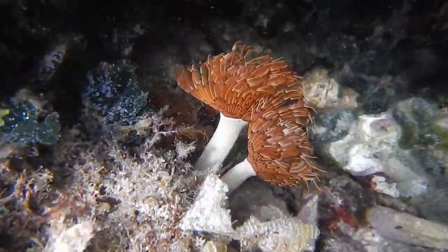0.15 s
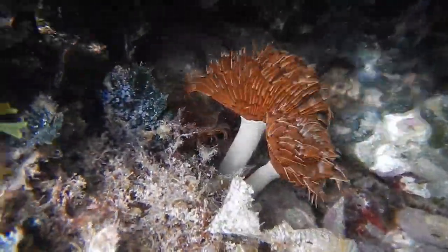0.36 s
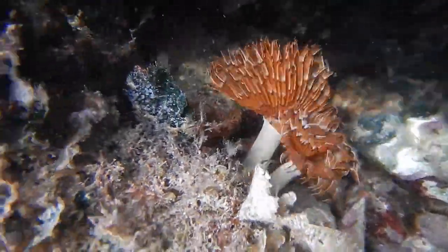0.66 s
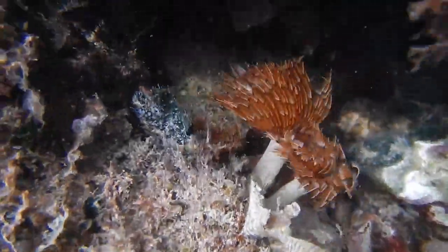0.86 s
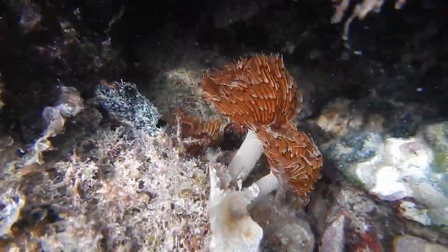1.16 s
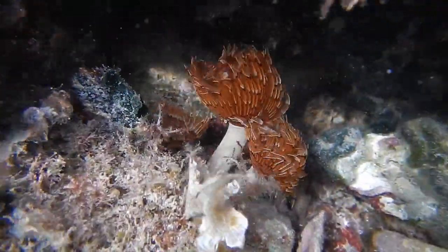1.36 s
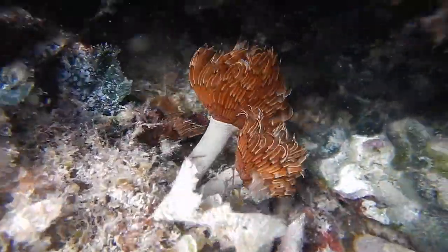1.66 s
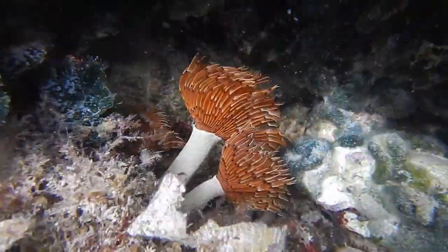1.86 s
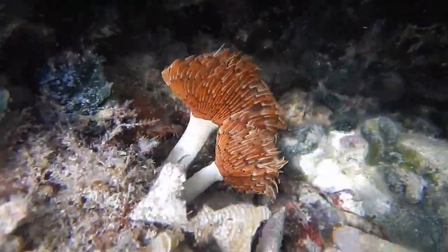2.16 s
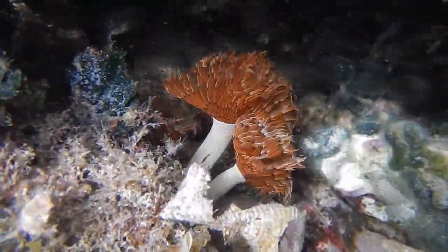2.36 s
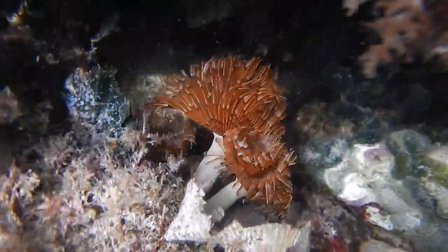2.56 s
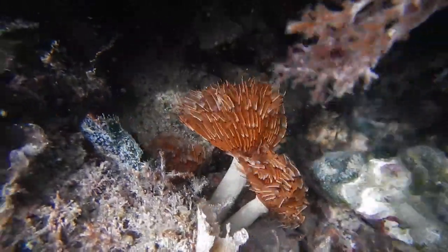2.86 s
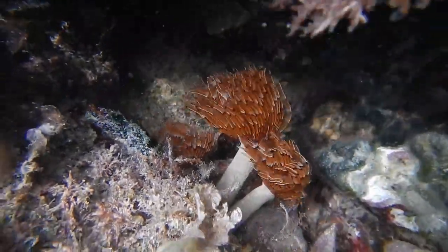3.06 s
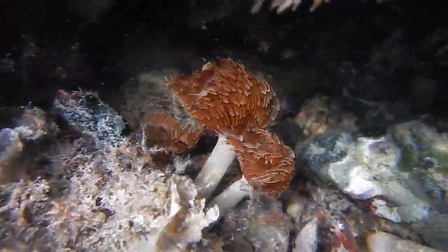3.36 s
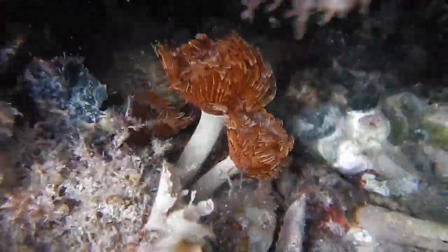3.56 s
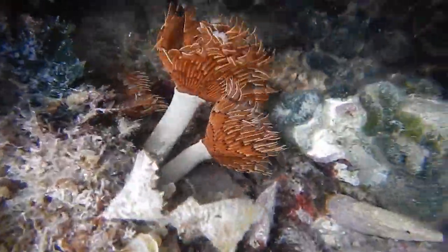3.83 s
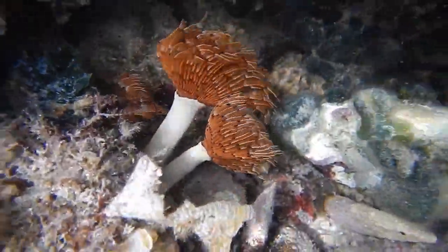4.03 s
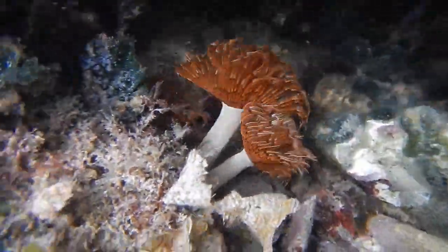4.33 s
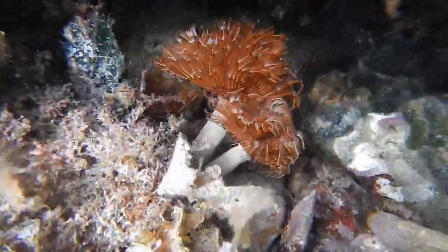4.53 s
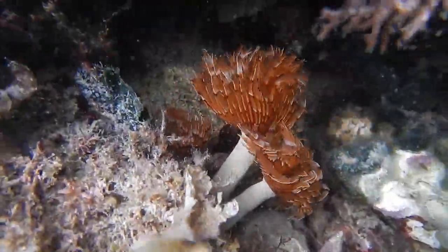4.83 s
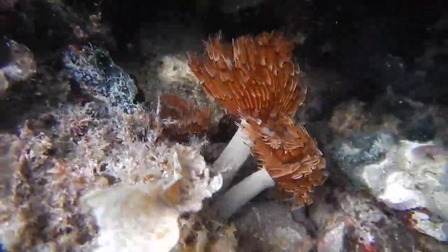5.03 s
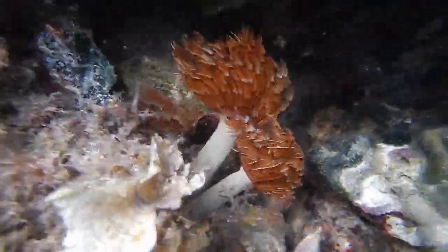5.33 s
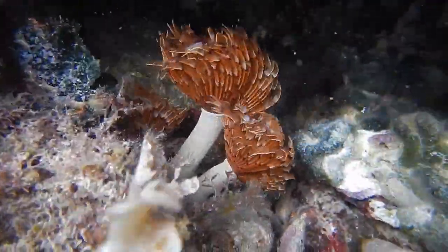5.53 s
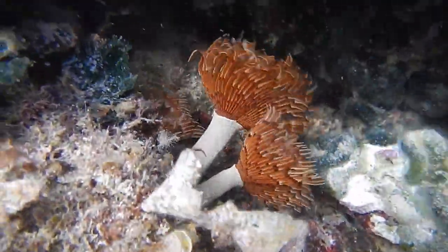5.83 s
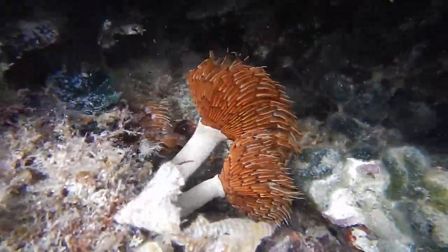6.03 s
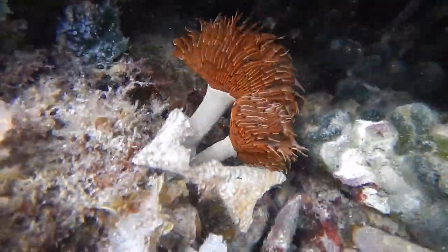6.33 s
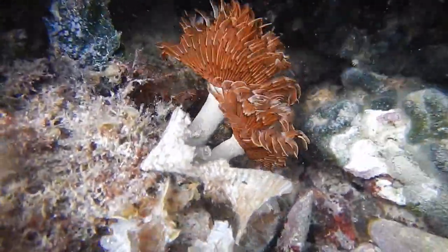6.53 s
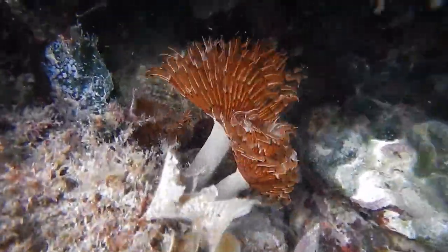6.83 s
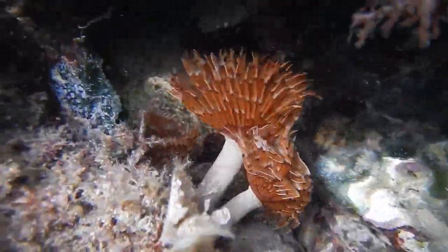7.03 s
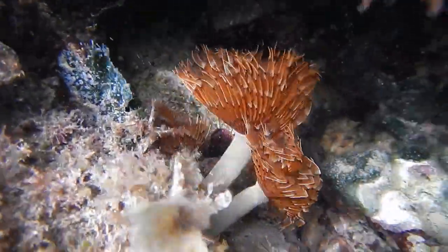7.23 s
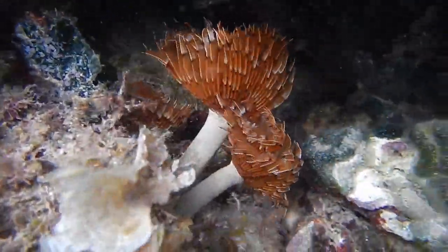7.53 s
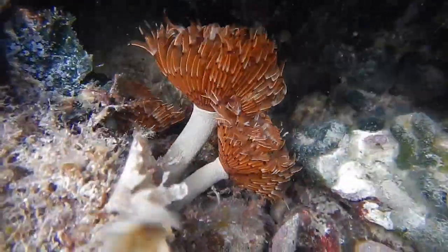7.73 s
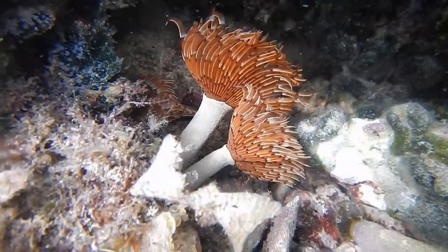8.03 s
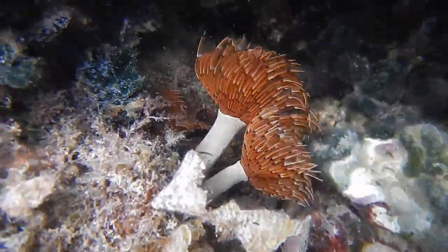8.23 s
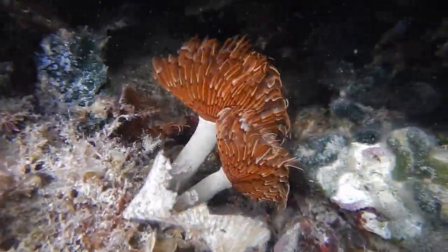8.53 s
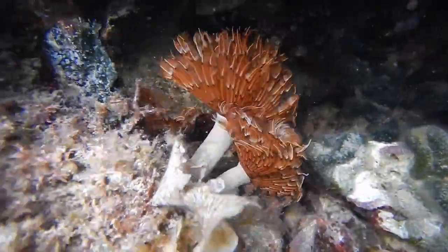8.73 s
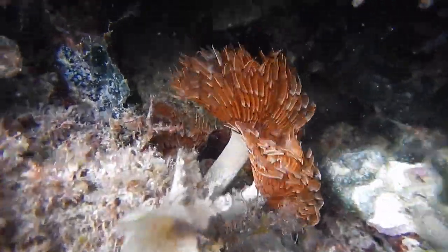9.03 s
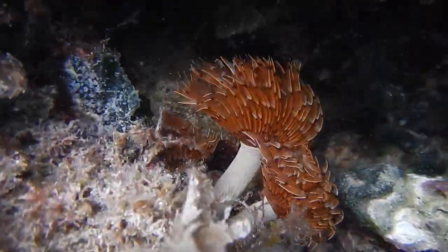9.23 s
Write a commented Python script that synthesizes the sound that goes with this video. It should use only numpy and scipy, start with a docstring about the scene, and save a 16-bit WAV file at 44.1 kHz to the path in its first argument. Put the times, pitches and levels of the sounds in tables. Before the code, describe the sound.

Hollow, boxed-in water noise swells and dips in a rocky shallow while brittle clicks crack over low bumps and stony knocks.

```python
"""A soft push and dull knocks over a held-down rush of water, then sharp snaps: a housed camera in swell.
Buffeting, slosh and rush are filtered noise with drifting levels; surges lift them and ticks prickle on top.
Thuds, stone knocks, grit and snaps (shrimp, grit) are single pulses that ring the watertight housing,
each with scatter off nearby rock. A gain control ducks on peaks over its ceiling, so the rush drops
and swells back at a steady rate; notches and a band limit finish the sound."""
import sys
import numpy as np
from scipy import signal
from scipy.fft import rfft, irfft, next_fast_len
from scipy.io import wavfile
from scipy.ndimage import uniform_filter1d, minimum_filter1d, map_coordinates

SR = 44100
rng = np.random.default_rng(int(sys.argv[2]) if len(sys.argv) > 2 else 0)


def master(y):
    """Save y as 16-bit WAV."""
    cut = np.clip(np.atleast_2d(y).T, -1, 1)
    pcm = np.round(cut * 32767)  # scale
    wavfile.write(sys.argv[1], SR, pcm.astype(np.int16))


N = 413658

# Event levels are peaks ahead of the gain control; spectra are relative.
# swell, surges and lulls: crest t/s, 1/e half width/s, lift/dB
SWELL_LIFTS = [(0.122, 0.12, 9.5), (0.65, 0.43, 3.5), (1.9, 0.57, 0.5), (3.299, 0.25, -4.5),
               (4.399, 0.16, 11), (5.3, 0.33, 11), (5.851, 0.16, 11), (8.4, 0.079, -3), (9.15, 0.39, 5.5)]
# low buffeting of the housing by eddies: f/Hz, density/(dB per Hz)
BUFFET_SPECTRUM = [(12, -11.5), (30, -2), (80, 0), (150, -3), (230, -5), (400, -34.5), (900, -83)]
# slosh in the low resonances: f/Hz, density/(dB per Hz)
SLOSH_SPECTRUM = [(100, -40), (200, -14.5), (270, -9.5), (322, -1), (360, -5), (400, -2.5), (460, -8.5),
                  (540, -23), (900, -47.5), (2000, -80)]
# rush in the middle resonances: f/Hz, density/(dB per Hz)
RUSH_SPECTRUM = [(250, -20.5), (600, -0.5), (800, -1.5), (1000, 6), (1170, -3), (1400, 0.5), (1750, -13),
                 (2150, -14.5), (2550, -39.5), (2900, -27), (3400, -30), (3850, -41.5), (5200, -44.5),
                 (6400, -44), (7400, -53.5), (8400, -50.5), (9400, -59), (16000, -72.5)]
# far ticks ahead of their low-pass: f/Hz, density/(dB per Hz)
TICK_SPECTRUM = [(400, -15.5), (1000, -1.5), (1400, 9.5), (2000, -5), (2950, 0.5), (3500, -10), (5000, -20)]
# soft pushes on the housing: t/s, level/dB, tilt/(dB per octave)
THUD_EVENTS = [(0.053, 16.5, -8), (0.069, 11, 8.5), (0.083, 8, -0.5), (0.236, 6, 1), (0.311, -2, -4.5),
               (0.871, -4, 13), (0.976, -1.7, -3), (1.821, -4, 4), (2.085, -7.5, -2), (2.174, -4, 0.5),
               (3.074, -9, 1), (3.905, -6, 17.5), (4.37, 2, 7), (4.456, 2.5, 6.5), (4.643, -7, 19.5),
               (5.489, -4.5, -6), (6.486, -2.2, 4.5), (7.115, -7, 26.5), (7.492, -1.3, 13.5),
               (7.995, -3.5, 12), (9.291, -7, 8)]
# housing colour under a soft push: f/Hz, level/dB
THUD_COLOUR = [(30, -38), (120, -23), (240, -14), (325, 4), (395, 3), (500, -12.5), (700, -21), (1100, -28),
               (1600, -34), (3000, -76), (8000, -100)]
# dull knocks of shifting stones: t/s, level/dB, roll-off f/Hz
STONE_KNOCKS = [(0.1179, 11.5, 1320), (0.1544, 0.5, 1660), (0.3749, 8.5, 1150), (1.4959, 4, 1426),
                (2.7785, 11.5, 1110), (3.3134, 4, 1510), (3.3314, 12, 2400), (3.5745, -2, 2300),
                (3.742, 6.5, 1600), (3.7519, 15.5, 1970), (3.7905, 4, 1500), (4.9996, 13, 2405),
                (5.0623, 8, 720), (5.188, -6, 3220), (6.395, -9.5, 4200), (7.1639, 6.5, 1900),
                (7.7578, 11.5, 1200), (7.949, 2.5, 900), (8.0438, -4, 1900), (8.5237, -2, 890),
                (8.724, 2, 1250), (9.1976, -2, 2370)]
# grit rolled over the rock: middle t/s, half length/s, level/dB
GRIT_FLURRIES = [(2.598, 0.05, -8.5), (3.639, 0.079, -5.5), (4.428, 0.055, -3.5), (4.928, 0.05, -8),
                 (5.62, 0.06, -3)]
# sharp snaps: t/s, level/dB, tilt/(dB per octave), scatter off rock/dB
SNAP_EVENTS = [(0.2773, 16.5, -2.5, -6.5), (0.998, 13, -0.5, -2.5), (1.5568, 23, 0, -6.5),
               (1.701, -10, 13, -8), (1.7208, 24, -5.5, -6), (2.224, 4, -3.5, -2.5),
               (2.6688, 14.5, -3.5, -7), (2.8647, 19.5, -1, -8.5), (3.7174, 12, -1, 7),
               (4.586, -3.5, -3, 2.5), (4.9299, -0.5, -3.5, -4.5), (4.9834, 1, -0.5, 4.5),
               (4.9867, 11.5, 0.5, 4), (5.6518, 5, -4, 8.5), (5.6827, 12, 2.5, 4.5), (5.7467, 13.5, -3, -6),
               (5.7564, 28, 1.5, 0.5), (7.1586, 17, 0, 0), (7.7298, 23.5, -1.5, -4.5),
               (8.6015, 11.5, -2, -0.5), (8.6907, 20, -4, -7)]
# housing colour under a snap or knock: f/Hz, level/dB
STRIKE_COLOUR = [(100, -28), (350, -22), (600, -13), (760, -3), (870, -10), (1020, 4.5), (1200, -1),
                 (1450, 2), (1700, -9.5), (2150, -14.5), (3200, -23.5), (4500, -29), (6500, -35.5),
                 (16000, -51)]
# likeness of the two microphones: f/Hz, correlation (-1..1)
MIC_LIKENESS = [(50, 0.37), (130, 0.9), (380, 1), (560, 0.057), (1400, 0.94), (3500, 0.89)]
# left over right, ahead of each source's lean factor: f/Hz, level/dB
MIC_BALANCE = [(50, -1.5), (350, -2), (650, -1), (850, 3.5), (1020, 3.5), (1400, 11.5), (1800, 5),
               (3000, 9), (4200, 1), (8000, 3.5)]
# phase by which left leads right: f/Hz, phase/rad
MIC_LEAD = [(420, -0.28), (750, -0.96), (1300, -0.8), (2200, -1.68), (4500, -1.41), (9000, -0.86)]
# narrow rejected bands: f/Hz, width/Hz
NOTCH_BANDS = [(2500, 270), (5000, 110), (6000, 90), (7000, 90), (8000, 90), (9000, 90), (10000, 90),
               (11000, 90)]

# steady current, rms ahead of swell, drift and gain control
BUFFET_DB, SLOSH_DB, RUSH_DB = -35, -24.5, -22
# share of the swell lift (slosh takes all of it)
BUFFET_FOLLOWS_DB_PER_DB, RUSH_FOLLOWS_DB_PER_DB = 0.41, 0.17
TICKS_PER_S, TICK_DECAY_S, TICK_TOP_HZ, TICKS_RE_RUSH_DB = 40, 0.0035, 3900, -23.5
KNOCK_TILT_DB_PER_OCT, KNOCK_SCATTER_DB = 6.5, -3
GRIT_COUNT, GRIT_DB, GRIT_MID_ROLLOFF_HZ = 24, -13, 2200
FLURRY_GRAINS, FLURRY_MID_ROLLOFF_HZ, GRAIN_SPREAD_OCT = 8, 1620, 0.49
# a harder snap is a shorter pulse: roll-off at 0 dB, level step that doubles it
SNAP_ROLLOFF_AT_0DB_HZ, SNAP_DOUBLING_DB = 6000, 19
HIT_SAMPLES, ONSET_SAMPLES = 4096, 20
STRIKE_ADVANCE_S = 0.0005  # offsets the onset samples
TOP_HZ = 16500


def amp(db):
    """Decibels to gain."""
    return 10 ** (np.asarray(db) / 20)


def unit(x):
    """Scale to rms 1."""
    return x / np.sqrt(np.mean(x ** 2) + 1e-20)


def along(points, hz):
    """Read (f/Hz, value) points on a log frequency axis."""
    f, value = np.transpose(points)
    return np.interp(np.log(hz + 1), np.log(f + 1), value)


def wobble(knots_per_s):
    """Smooth random curve through normal knots."""
    knots = rng.standard_normal(int(N * knots_per_s / SR) + 4)
    return map_coordinates(knots, [np.arange(N) * knots_per_s / SR])


def filtered(x, response):
    """Apply a complex frequency response to x."""
    m = next_fast_len(N + SR // 2)
    return irfft(rfft(x, m) * response(np.fft.rfftfreq(m, 1 / SR)), m)[..., :N]


def causal(db):
    """Minimum-phase response with this gain: rings after a blow, never before."""
    cepstrum = irfft(np.log(amp(db)))
    half = len(cepstrum) // 2
    fold = np.r_[1, np.full(half - 1, 2), 1, np.zeros(half - 1)]
    return np.exp(rfft(cepstrum * fold))


def microphones(hz, lean):
    """Housing wall flexes differently at each microphone: level and phase differ by band."""
    side = np.array([[.5], [-.5]])
    gain = amp(side * lean * along(MIC_BALANCE, hz))
    return gain * np.exp(1j * side * along(MIC_LEAD, hz))


def add(track, s, sound):
    """Mix a short stereo sound in at time s."""
    start = int(np.clip(round(s * SR), 0, N - 1))
    track[:, start:start + sound.shape[1]] += sound[:, :N - start]


def surge():
    """Swell lift in dB: a sum of bell-shaped surges and lulls."""
    t = np.arange(N) / SR
    return sum(db * np.exp(-((t - s) / width) ** 2) for s, width, db in SWELL_LIFTS)


def turbulence(spectrum, patchy_db):
    """Stereo flow noise of rms 1 whose gain drifts in patches of time and frequency."""
    z = signal.stft(rng.standard_normal((2, N)), nperseg=512)[2]
    field = uniform_filter1d(rng.standard_normal(z.shape[1:]), size=5, axis=0)
    field = uniform_filter1d(field, size=7, axis=1)
    pair = signal.istft(z * amp(patchy_db * unit(field)), nperseg=512)[1][:, :N]

    def mid_side(hz):
        turn = np.arccos(np.clip(along(MIC_LIKENESS, hz), -1, 1)) / 2
        return amp(along(spectrum, hz)) * [np.cos(turn), np.sin(turn)]

    mid, side = filtered(pair, mid_side)
    left_right = np.array([mid + side, mid - side])
    return unit(filtered(left_right, lambda hz: microphones(hz, lean=0.71)))


def far_ticks():
    """Random decaying puffs of noise, rms 1: most tiny, a few strong, top octaves lost."""
    sizes = amp(5.9 * np.minimum(rng.exponential(size=N), 2.6))
    impulses = (rng.random(N) < TICKS_PER_S / SR) * sizes
    puffs = signal.lfilter([1], [1, -np.exp(-1 / (TICK_DECAY_S * SR))], impulses)
    lowpass = signal.butter(6, TICK_TOP_HZ, fs=SR, output="sos")
    return unit(signal.sosfilt(lowpass, puffs * turbulence(TICK_SPECTRUM, patchy_db=4)))


def water():
    """Eddies buffet the housing and stir its low and middle resonances; far ticks on top."""
    lift_db = surge()
    buffet_db = BUFFET_DB + BUFFET_FOLLOWS_DB_PER_DB * lift_db + 0.53 * wobble(9.9)
    slosh_db = SLOSH_DB + lift_db + 3.2 * wobble(36)
    rush_db = RUSH_DB + RUSH_FOLLOWS_DB_PER_DB * lift_db
    rush_drift_db = 0.7 * wobble(18) + 0.9 * wobble(90)
    buffet = amp(buffet_db) * turbulence(BUFFET_SPECTRUM, patchy_db=1.6)
    slosh = amp(slosh_db) * turbulence(SLOSH_SPECTRUM, patchy_db=0.5)
    rush = amp(rush_db + rush_drift_db) * turbulence(RUSH_SPECTRUM, patchy_db=2.07)
    return buffet + slosh + rush + amp(rush_db + TICKS_RE_RUSH_DB) * far_ticks()


def blow(colour_db, echo_db, t60_s, lean):
    """One pressure pulse plus scatter off nearby rock, ringing the housing; peak 1."""
    t, hz = np.arange(HIT_SAMPLES) / SR, np.fft.rfftfreq(HIT_SAMPLES, 1 / SR)
    # shared part, then a weaker part per channel
    scatter = rng.standard_normal(HIT_SAMPLES) + 0.25 * rng.standard_normal((2, HIT_SAMPLES))
    scatter = scatter * amp(-60 * t / t60_s) * (1 - np.exp(-(t / 0.00074) ** 2))
    scatter = scatter / np.linalg.norm(scatter[0])
    # weed and rough rock return little treble
    echoes = amp(echo_db) * rfft(scatter) / (1 + (hz / 3200) ** 2)
    sound = irfft((1 + echoes) * causal(colour_db) * microphones(hz, lean))
    # room ahead of the onset for the phase lead
    sound = np.roll(sound, ONSET_SAMPLES, axis=1)[:, :HIT_SAMPLES * 3 // 4]
    return sound / np.abs(sound).max()


def thuds():
    """Soft pushes ring mainly the housing's low resonances, each with its own tilt."""
    out, hz = np.zeros((2, N)), np.fft.rfftfreq(HIT_SAMPLES, 1 / SR)
    octaves = np.clip(np.log2((hz + 1) / 340), -1.2, .6)
    for s, db, tilt_db in THUD_EVENTS:
        colour_db = along(THUD_COLOUR, hz) + tilt_db * octaves
        add(out, s, amp(db) * blow(colour_db, echo_db=-10.5, t60_s=0.12, lean=0.18))
    return out


def strike(tilt_db, rolloff_hz, scatter_db):
    """Pulse on the housing, peak 1: high roll-off (short pulse) cracks, low only knocks."""
    hz = np.fft.rfftfreq(HIT_SAMPLES, 1 / SR)
    octaves = np.clip(np.log2((hz + 1) / 1100), -.8, 1.6)
    softness_db = 10 * np.log10(1 + (hz / rolloff_hz) ** 8)
    colour_db = along(STRIKE_COLOUR, hz) + tilt_db * octaves - softness_db
    return blow(colour_db, echo_db=scatter_db, t60_s=0.027, lean=0.39)


def grain(s, db, mid_rolloff_hz):
    """One grain of grit: a knock whose roll-off varies at random."""
    return s, db, mid_rolloff_hz * 2 ** (GRAIN_SPREAD_OCT * rng.normal())


def knocks():
    """Stones knock nearby; grit rattles in flurries and knocks faintly at random times."""
    out = np.zeros((2, N))
    stray = [grain(rng.random() * N / SR, GRIT_DB, GRIT_MID_ROLLOFF_HZ) for _ in range(GRIT_COUNT)]
    rolled = []
    for s, half_s, db in GRIT_FLURRIES:
        for _ in range(FLURRY_GRAINS):
            rolled.append(grain(s + half_s * rng.uniform(-1, 1), db, FLURRY_MID_ROLLOFF_HZ))
    for s, db, rolloff_hz in [*STONE_KNOCKS, *stray, *rolled]:
        knock = strike(KNOCK_TILT_DB_PER_OCT, rolloff_hz, KNOCK_SCATTER_DB)
        add(out, s - STRIKE_ADVANCE_S, amp(db) * knock)
    return out


def snaps():
    """Collapsing cavities: the stronger the snap, the higher its treble roll-off."""
    out = np.zeros((2, N))
    for s, db, tilt_db, scatter_db in SNAP_EVENTS:
        rolloff_hz = SNAP_ROLLOFF_AT_0DB_HZ * 2 ** (db / SNAP_DOUBLING_DB)
        add(out, s - STRIKE_ADVANCE_S, amp(db) * strike(tilt_db, rolloff_hz, scatter_db))
    return out


def scene():
    """Everything that reaches the microphones through the housing."""
    return water() + thuds() + knocks() + snaps()


def gain_control(x, ceiling_db, release_db_per_s, start_db):
    """Peaks over the ceiling push the gain down fast; it climbs back at a steady rate in dB."""
    climb_db = release_db_per_s * np.arange(N) / SR
    peak_db = 20 * np.log10(np.abs(x).max(axis=0) + 1e-9)
    over_db = np.maximum(peak_db - ceiling_db, 0)
    held_db = np.maximum.accumulate(over_db + climb_db)
    cut_db = np.maximum(held_db, start_db) - climb_db
    # steps smoothed over about 1 ms
    return x * amp(uniform_filter1d(minimum_filter1d(-cut_db, size=45), size=45))


def record(dry):
    """The camera rides its gain, notches narrow bands and drops all above its band limit."""
    held = gain_control(dry, ceiling_db=-1.5, release_db_per_s=17.5, start_db=17.0)

    def response(hz):
        passed = hz < TOP_HZ
        for centre, width in NOTCH_BANDS:
            gap = centre * centre - hz * hz
            passed = passed * gap / (gap + 1j * hz * width)
        return passed

    return filtered(held, response)


dry = scene()
out = record(dry)
master(out)
```